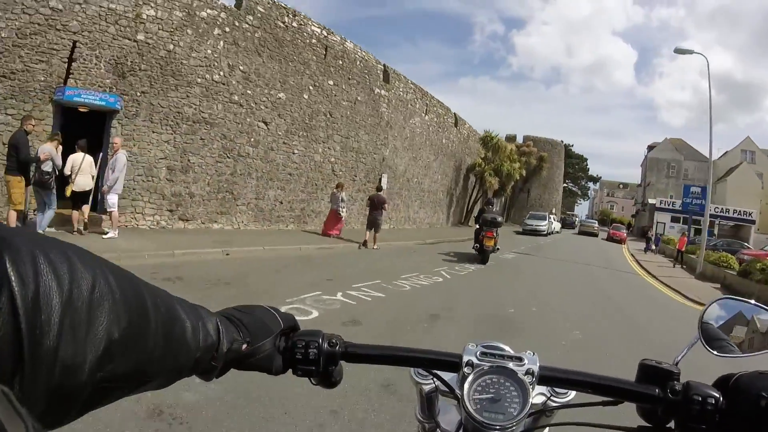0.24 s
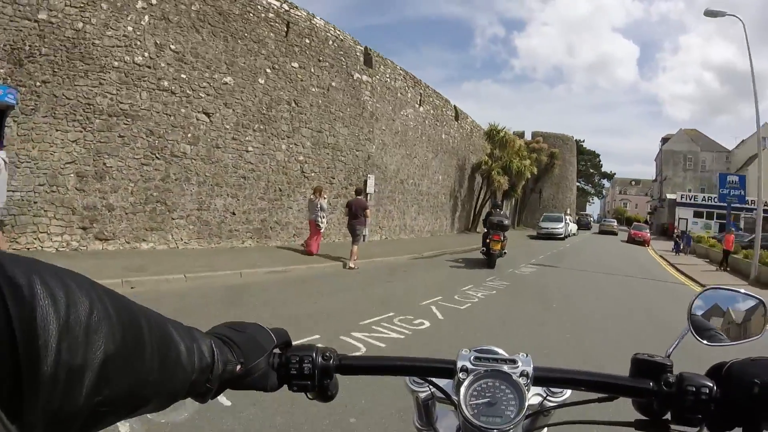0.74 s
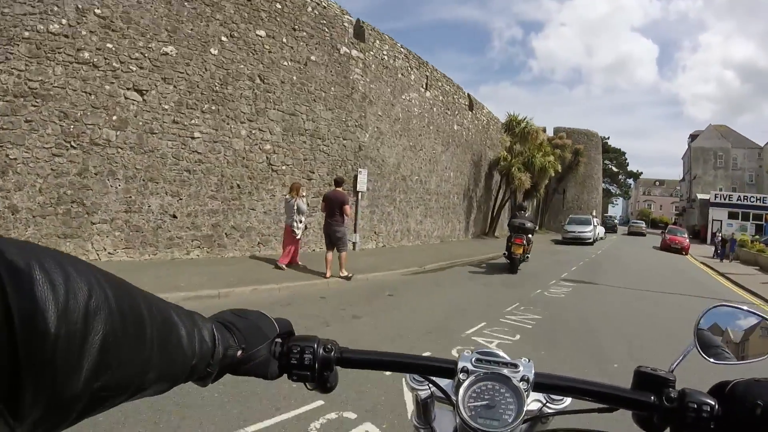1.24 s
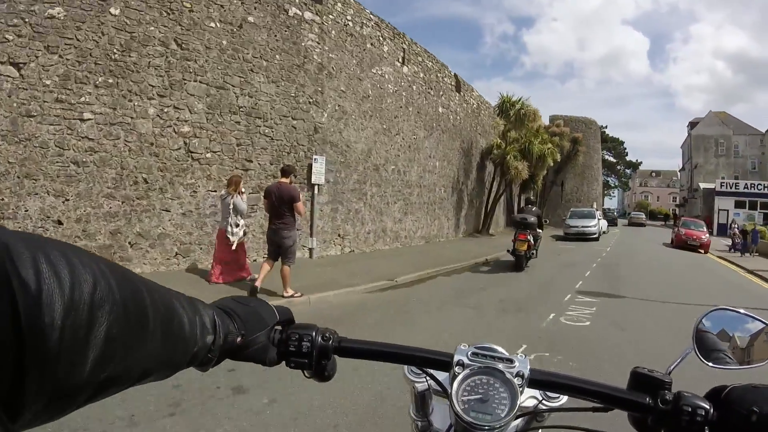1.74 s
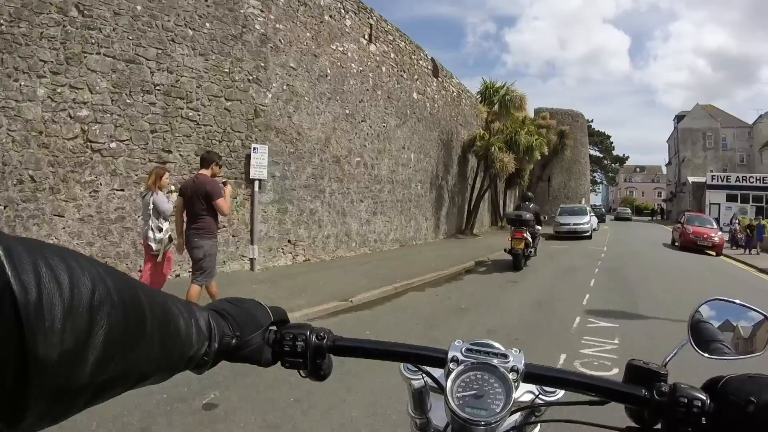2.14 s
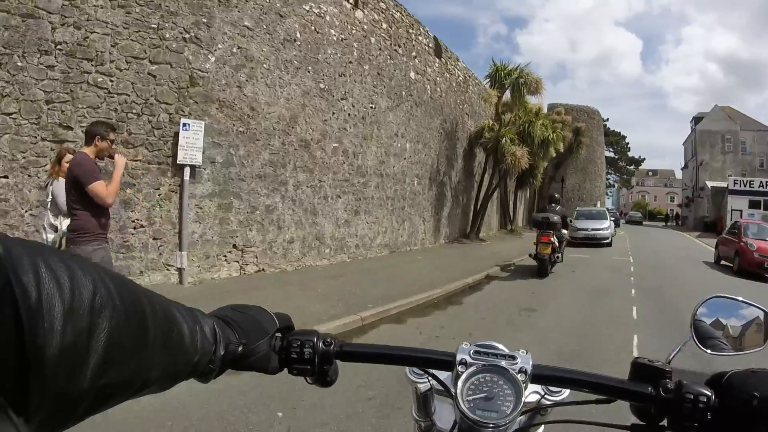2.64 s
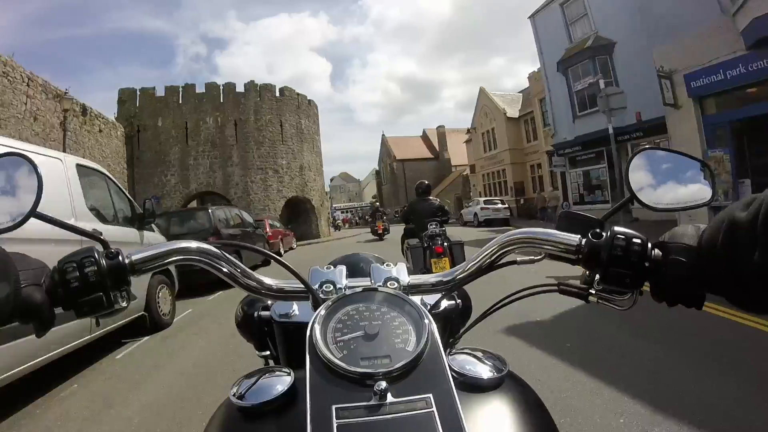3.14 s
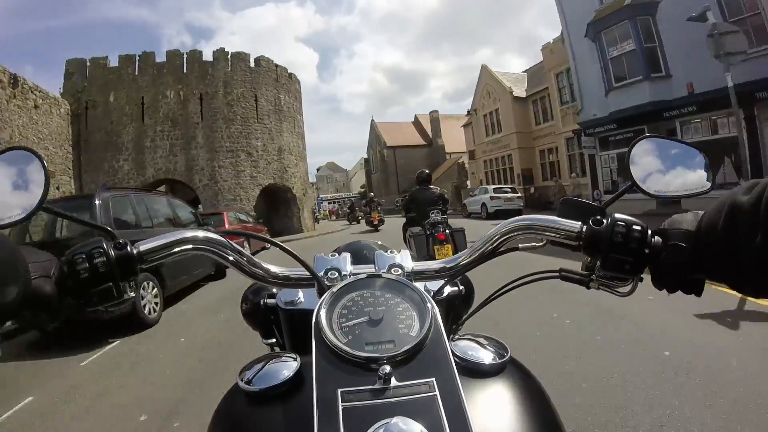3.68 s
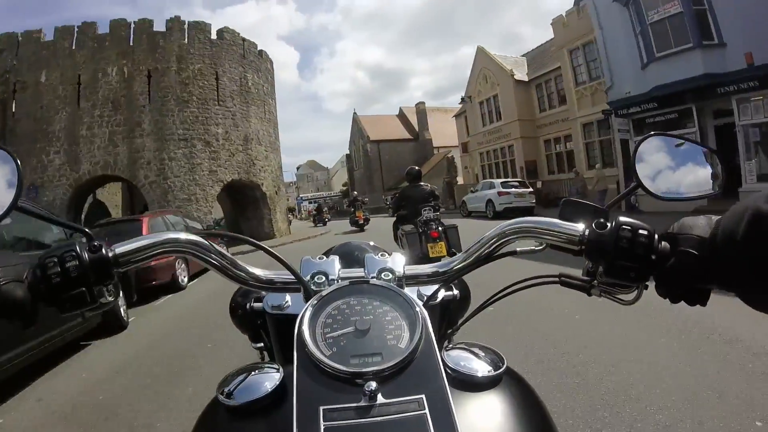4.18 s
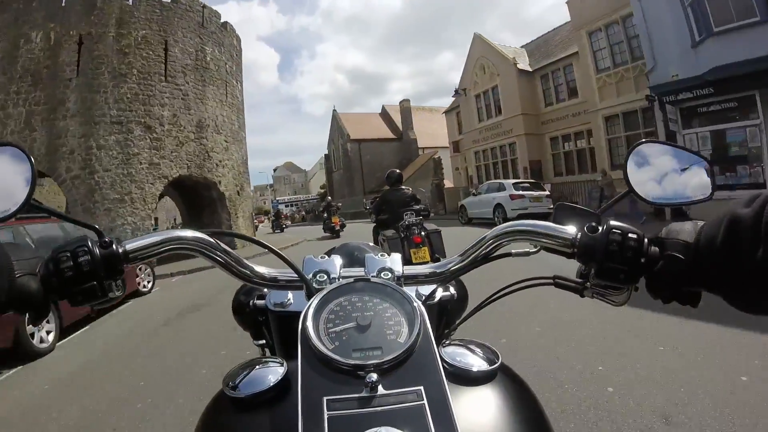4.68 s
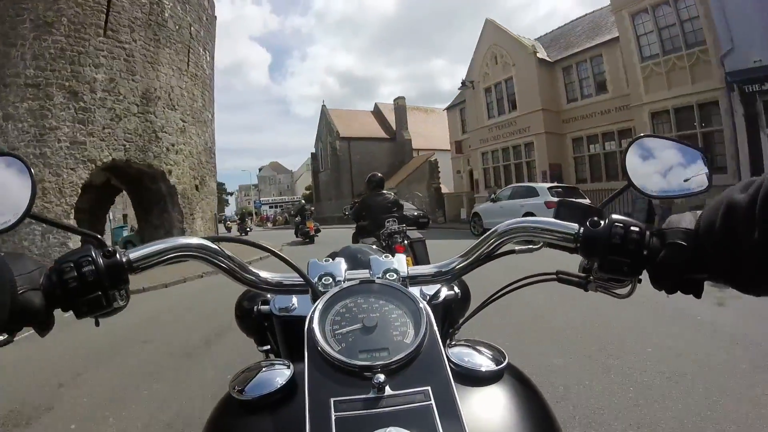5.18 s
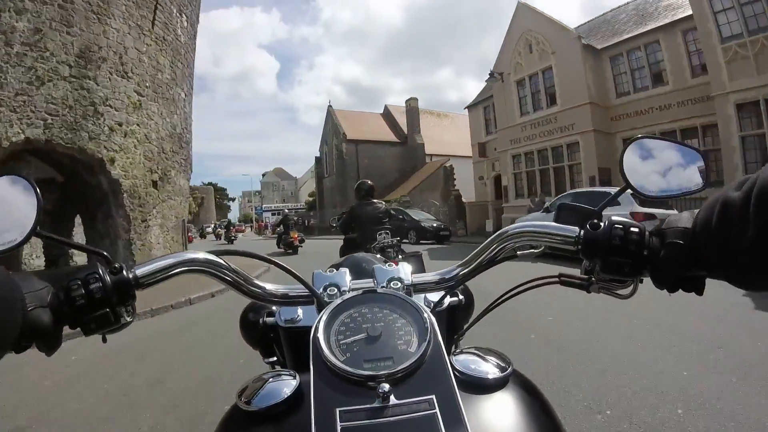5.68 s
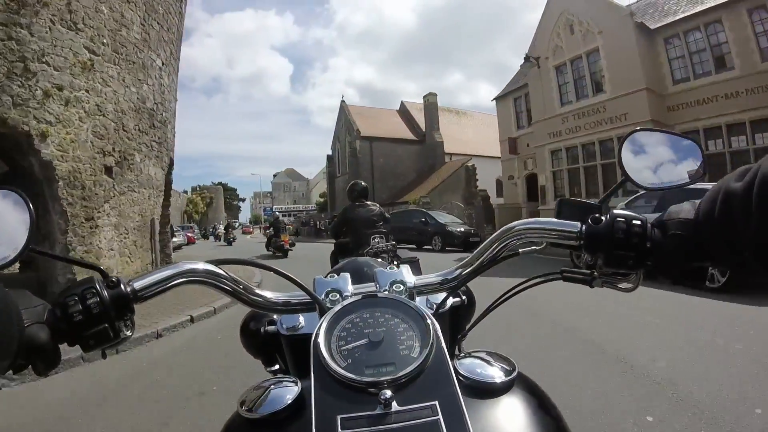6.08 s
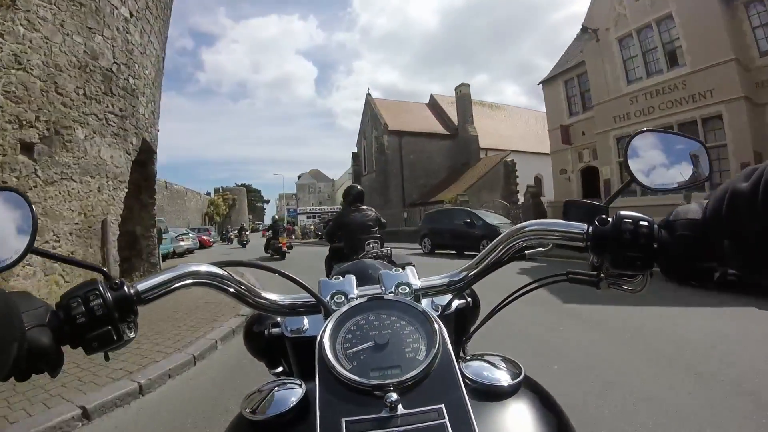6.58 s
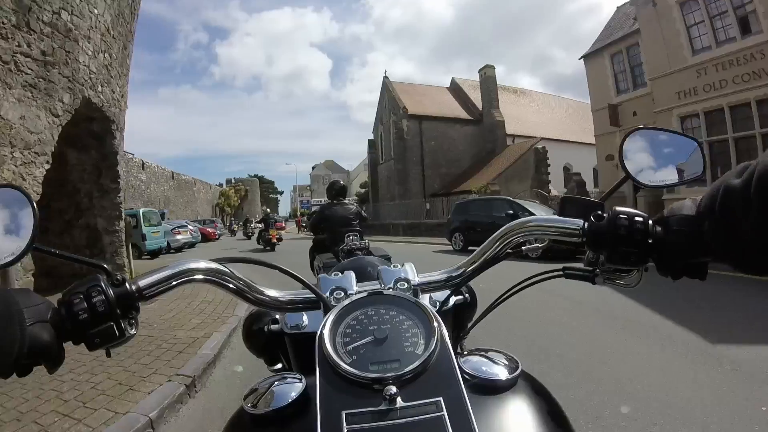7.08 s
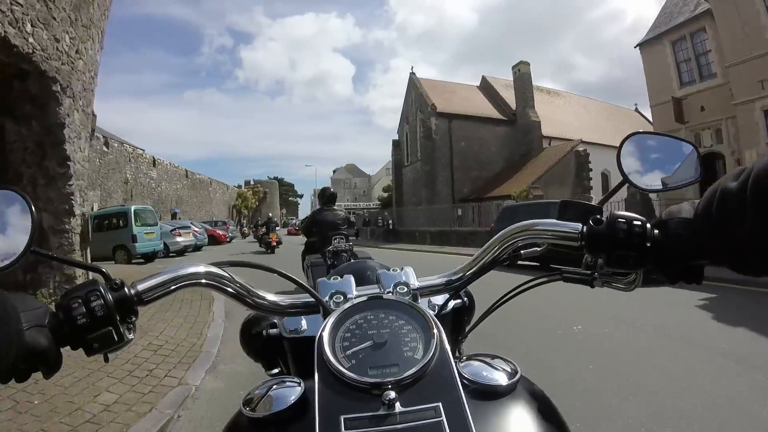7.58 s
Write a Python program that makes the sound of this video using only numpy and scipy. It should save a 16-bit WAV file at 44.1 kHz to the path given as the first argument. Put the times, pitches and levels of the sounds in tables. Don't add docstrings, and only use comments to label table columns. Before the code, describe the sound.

Heard from a camera on a large two-cylinder motorcycle: revs fall to a loud, lumpy idle thrown back by a stone wall, with deep thumps, rasp and hollow exhaust barks. A click marks an abrupt cut to a much quieter, even engine roll in a street. The throttle shuts, metallic valve ticks show through as the engine coasts and fades, and the idling motorcycle ahead comes near.

```python
import sys
import numpy as np
from scipy import signal
from scipy.io import wavfile
from scipy.ndimage import uniform_filter1d

SR = 44100
rng = np.random.default_rng(int(sys.argv[2]) if len(sys.argv) > 2 else 0)


def volts_from_db(level):
    exponent = np.asarray(level, float) / 20
    return 10 ** exponent


def transcribe(u):
    v = np.clip(np.atleast_2d(u).T, -1, 1)
    q = np.round(v * 32767).astype(np.int16)
    wavfile.write(sys.argv[1], SR, q)


N = 344862
CUT_S = 3.07834


def evened(x):
    return x / np.sqrt(np.mean(x ** 2) + 1e-20)


def drifting(x, size, passes=1):
    for _ in range(passes):
        x = uniform_filter1d(x, size=size)
    return evened(x)


def curve(rows):
    s, value = np.transpose(rows)
    return np.interp(np.arange(N) / SR, s, value)


def firings(speed, start, pattern, jitter_s, spread_db):
    turns = start + np.cumsum(curve(speed)) / SR
    chance = rng.standard_normal((120, len(pattern), 2))
    out = np.zeros(N)
    for k, (place, db) in enumerate(pattern):
        at = np.interp(np.arange(120) + place, turns, np.arange(N), -N, -N)
        at = at + jitter_s * SR * chance[:, k, 0]
        inside = (at >= 0) & (at < N)
        out[at[inside].astype(int)] += volts_from_db(db + spread_db * chance[inside, k, 1])
    return out


def noise(spectrum, peaks, size, patchy_db):
    hz = np.fft.rfftfreq(size, 1 / SR)
    a, b, patches = rng.standard_normal((4 * N // size + 5, len(hz), 3)).T
    patches = uniform_filter1d(patches, size=9, axis=0)
    patches = evened(uniform_filter1d(patches, size=5, axis=1))
    f, db = np.transpose(spectrum)
    shape_db = np.interp(np.log(hz + 1), np.log(f + 1), db, -100, -100)
    for at_hz, width_hz, boost_db in peaks:
        shape_db += boost_db / (1 + (2 * (hz - at_hz) / width_hz) ** 2)
    z = (a + 1j * b) * volts_from_db(shape_db[:, None] + patchy_db * patches)
    return evened(signal.istft(z, nperseg=size, noverlap=size * 3 // 4)[1][:N])


def puffed(x, clicks, depth, fade_s):
    flare = signal.lfilter([1], [1, -np.exp(-1 / (fade_s * SR))], clicks)
    return evened(x * (1 + depth * uniform_filter1d(flare, size=60)))


def swelling_rings(rows, rise_s, trim_db):
    out, u = np.zeros(N), np.arange(3000) / SR / rise_s
    chance = rng.uniform(-1.18, 1, (len(rows), 2))
    for (s, db, hz), (phase, bend) in zip(rows, chance):
        turns = hz * rise_s * (u + .02 * bend * (u - 1) ** 2)
        ring = u * np.exp(1 - u) * np.sin(2 * np.pi * turns + np.pi * phase)
        out[round((s - .004) * SR):][:3000] += volts_from_db(db + trim_db) * ring
    return out


def pipe(s, db, modes, pitch=1):
    lead = round(.1 * SR)
    t, ring = np.arange(SR // 3) / SR, 0
    shift = np.broadcast_to(pitch, s.shape)[:, None]
    for hz, mode_db, t60, rise_s, low in modes:
        turns = hz * (t - low * rise_s * (1 - np.exp(-t / rise_s)))
        swell = (1 - np.exp(-t / (rise_s * (1 - low)))) ** 2
        ring = ring + volts_from_db(mode_db - 60 * t / t60) * swell * np.sin(2 * np.pi * turns * shift)
    out = np.zeros(N + lead)
    for at, gain, sound in zip(np.round(s * SR).astype(int) + lead, volts_from_db(db), ring):
        out[at:at + len(t)] += gain * sound
    return out[lead:] / np.std(out[lead:lead + round(CUT_S * SR)])


def tones(speed, orders, level, smear, wobble):
    step = 16
    turns, out = np.cumsum(curve(speed))[::step] / SR, 0
    for k, db in orders:
        drift_db, drift = (drifting(v, 400, passes=2) for v in rng.standard_normal((len(turns), 2)).T)
        twin = np.angle(1 + .7 * np.exp(-2j * np.pi * k * .4375))
        phase = 2 * np.pi * (k * turns + smear * k * k) + twin + wobble * drift
        out = out + volts_from_db(db + 3.3 * wobble * drift_db) * np.sqrt(2) * np.cos(phase)
    return volts_from_db(curve(level)) * signal.resample_poly(out, step, 1)[:N]


# (time [s], level [dB rms])
WHINE = [(0, -84), (.7, -84), (.78, -78), (1.98, -78), (2.05, -85), (3.08, -85)]


def whine():
    drift, flicker = (drifting(v, 1500) for v in rng.standard_normal((2, N)))
    turns = np.cumsum(11870 + 12 * drift) / SR
    return volts_from_db(curve(WHINE) + 3 * flicker) * np.sqrt(2) * np.sin(2 * np.pi * turns)


# (time [s], engine cycles [Hz])
IDLE_SPEED = [
    (0.0, 12.07),
    (0.5, 10.38),
    (1.0, 9.09),
    (1.3, 8.68),
    (3.1, 8.55),
]


def over_idle_hz():
    return curve(IDLE_SPEED) - IDLE_SPEED[-1][1]


# (frequency [Hz], density [dB per Hz])
WALL_RUMBLE = [(8.8, -54), (15, -34.5), (43, -15), (70, -10.5), (97, -33.5), (119, 1), (166, -7.5),
               (258, -4), (294, -7), (330, -12), (430, -66.5), (730, -120)]


def wall_rumble():
    front = firings(IDLE_SPEED, .9, [(.0, 0)], jitter_s=.0005, spread_db=1.3)
    return volts_from_db(-14.5) * puffed(noise(WALL_RUMBLE, [], size=4096, patchy_db=1.0), front, depth=1.0, fade_s=.04)


# (frequency [Hz], density [dB per Hz])
WALL_HISS = [(590, -18), (1000, -2.5), (1910, -8), (2270, -5.5), (2600, -13.5), (3330, -11), (4580, -14.5),
             (5950, -24.5), (7050, -24), (7810, -31), (8650, -26.5), (12200, -32), (15100, -63)]
# (frequency [Hz], width [Hz], boost [dB])
WALL_HOUSING = [(1278, 41, 7), (2265, 110, 7), (2734, 120, 7), (3370, 220, 4), (7030, 410, 5),
                (8420, 400, 7)]


def wall_hiss(gear):
    hiss = noise(WALL_HISS, WALL_HOUSING, size=1024, patchy_db=0.63)
    return volts_from_db(-43 + 0.13 * over_idle_hz()) * puffed(hiss, gear, depth=0.32, fade_s=0.026)


# (frequency [Hz], density [dB per Hz])
WALL_GROWL = [(180, -30), (300, -19), (327, -12.5), (355, -14.5), (561, -10.5), (638, -3), (867, -21.5),
              (1200, -38), (1560, -78), (2640, -120)]
# (time [s], level [dB])
OPENING = [
    (2.6, 1),
    (3.08, 1.5),
]


def wall_growl(gear):
    growl = puffed(noise(WALL_GROWL, [(635, 200, -4)], size=2048, patchy_db=1.5), gear, depth=.5, fade_s=.007)
    return volts_from_db(-32.5 - 0.24 * over_idle_hz() + curve(OPENING)) * growl


# (frequency [Hz], density [dB per Hz])
WALL_RASP = [(300, -33.5), (340, 2), (400, -2), (500, -5), (580, -30.5)]


def rasp():
    return volts_from_db(-36.5 + 1.66 * over_idle_hz()) * noise(WALL_RASP, [], size=2048, patchy_db=1.5)


# (peak time [s], peak level [dB], frequency [Hz])
KNOCKS = [(0.054, -29, 480), (0.134, -28.5, 503), (0.17, -28, 382), (0.202, -28, 398), (0.249, -26, 564),
          (0.347, -23, 557), (0.369, -21, 387), (0.416, -28, 390), (0.451, -29, 382), (0.499, -26, 380),
          (0.616, -29, 447), (0.646, -25, 431), (0.758, -26, 540), (0.815, -21, 500), (0.856, -26, 393),
          (0.895, -26, 474), (0.976, -23, 396), (1.026, -21, 495), (1.088, -27, 433), (1.196, -24, 395),
          (1.234, -30, 423), (1.296, -30, 390), (1.344, -25, 447), (1.384, -24.5, 544), (1.466, -25, 433),
          (1.499, -31, 471), (1.554, -28, 382), (1.614, -22, 485), (1.635, -27, 390), (1.733, -23, 456),
          (1.758, -30, 460), (1.807, -21, 456), (1.865, -24, 382), (1.889, -25, 417), (1.96, -35, 560),
          (2.226, -37, 473), (2.333, -28, 382), (2.391, -29, 447), (2.686, -24, 460), (2.722, -26, 556),
          (2.76, -25, 533), (2.788, -24, 557), (2.905, -20, 538), (2.978, -22, 540), (3.036, -20, 500)]


def knocks():
    return swelling_rings(KNOCKS, rise_s=.006, trim_db=-3.5)


# (peak time [s], peak level [dB], frequency [Hz])
BARKS = [(0.183, -30, 630), (0.264, -23.5, 600), (0.301, -25.5, 640), (0.344, -32, 657), (0.37, -25, 650),
         (0.459, -25, 640), (0.544, -25, 650), (0.605, -26, 670), (0.696, -30, 670), (0.729, -17.5, 650),
         (0.785, -27, 640), (0.804, -31, 650), (0.828, -27, 660), (0.851, -25, 660), (0.937, -23.5, 670),
         (0.955, -20, 664), (1.05, -28, 665), (1.085, -21.5, 664), (1.103, -20, 647), (1.125, -25, 640),
         (1.167, -24, 640), (1.188, -29.5, 632), (1.27, -24, 635), (1.314, -28, 614), (1.341, -27, 617),
         (1.389, -33.5, 610), (1.466, -31, 630), (1.505, -27, 642), (1.533, -28, 640), (1.584, -20, 627),
         (1.617, -24, 670), (1.646, -28, 670), (1.695, -45, 630), (1.774, -25, 596), (1.82, -20.5, 610),
         (1.848, -22.5, 670), (2.049, -26.5, 668), (2.082, -26.5, 645), (2.145, -28, 618),
         (2.162, -41, 615), (2.198, -25, 660), (2.315, -30, 636), (2.342, -29, 646), (2.432, -28, 625),
         (2.458, -28, 648), (2.51, -28, 630), (2.543, -23, 657), (2.626, -31, 620), (2.661, -25, 640),
         (2.687, -24, 617), (2.713, -25, 685), (2.744, -24, 645), (2.79, -23, 600), (2.861, -30, 626),
         (2.878, -31, 590), (2.901, -25, 644), (2.928, -25, 606), (2.985, -26, 570), (3.043, -20.5, 610),
         (3.063, -25, 633)]


def barks():
    return swelling_rings(BARKS, rise_s=.004, trim_db=-0.5)


# (front firing time [s], thump [dB], rear pipe [dB], pop [dB], shield ring [dB])
BURNS = [(-0.076, -4, -1, -7.0, -9.5), (0.0003, 0, -2.5, -0.5, 2), (0.0846, -3.0, -1.0, -1.5, -3.5),
         (0.1708, -1.0, -3, -0.5, -5.5), (0.2646, 3, -8, -3, -1), (0.357, -0.0, -6, 2.0, 1),
         (0.4515, 3, 0, -7.0, -9.5), (0.5514, 0, -3.5, -0.0, -1.0), (0.646, 3, -2, -1, 3),
         (0.747, -3.0, -1, 1.5, 4), (0.8484, -6.5, 2.0, -3.5, -1), (0.9595, 2.0, -2, 2.5, 4),
         (1.0682, 2.5, 0.5, 2.5, 1), (1.179, 2, -1.0, -1.5, -6.5), (1.2957, -2.5, 1, -0.5, 3),
         (1.4117, -2.5, 1.0, 1.5, -1), (1.525, 0.5, 3, 1.5, 0.0), (1.6386, -1.0, 1.5, 0.5, -7.0),
         (1.758, -0.5, 5, 2.5, 5), (1.8732, -0.5, 0.0, 1.5, -1.5), (1.9862, 2.0, 3, -1.5, 4.5),
         (2.1034, -0.5, -0.5, 0.5, 1), (2.2198, -1.0, 2.5, 0.5, 1.5), (2.3366, 0.5, 0.5, -2.5, 3.0),
         (2.452, 1.0, 1, -1, -5), (2.5641, 0.5, 1.5, -2.0, 1.5), (2.6826, 1, 0, 0.5, 3.0),
         (2.8025, 0.0, -2.5, 1.5, 6), (2.9265, 0.5, 3, 2.5, 6.5), (3.0437, -3.5, 0.0, 2.0, -13.0)]
# (thump delay [s], thump return [dB], rear delay [s], rear pitch [ratio], rear return [dB])
STRAY = [(.03, -12.5, 0, 0.94, -3), (.027, -12, -0.00032, 1.05, -6), (.03, -12.5, .002, 1.07, -5.5),
         (.033, -11, 0, 1, -4), (.033, -11.5, 0, 1.04, -3.5), (.011, -4, 0, 1.01, -1.5),
         (.036, -11.5, .005, 1.044, -5.5), (.02, -9.5, 0.0049, 1.1, -4.5), (.032, -12, .004, 1.03, -6),
         (.013, -5, .006, 1.07, -5), (.017, -7, .008, 1.04, -5), (.008, -6, -.005, 1, -1.5),
         (.011, -5.5, .004, 1.05, -7), (0.015, -3.5, 0.0065, 1.07, -7), (.009, -3.5, 0.0073, 1.022, -5.5),
         (.012, -4, 0.0014, 0.91, -5.5), (.013, -4, .003, 1.02, -5.5), (.009, -5, .001, .99, 0.5),
         (.011, -6, .003, 1, -4), (.014, -7, .001, 1, 0), (.015, -5, .008, 1, -4),
         (.008, -5, .005, 1, -2.5), (.008, -4, 0.018, 1, -4.5), (.008, -4.5, .005, 1.01, -2.5),
         (0.0135, -4.5, -0.0095, 1.04, -6), (.011, -6, .006, 0.93, -5), (.012, -1, -.002, 1.01, -2),
         (.009, -4, -.003, 1.05, -4), (.007, -7.5, -.002, 1.01, -5), (0.0024, -5, 0, 1, -5)]
# (frequency [Hz], level [dB], t60 [s], rise [s], low start of pitch [share])
FRONT_PIPE = [(37.8, -24, 0.35, 0.0068, .0), (61.2, -6.5, 0.15, 0.012, 0.00058),
              (78.4, 3.5, 0.14, 0.01, .0)]
REAR_PIPE = [(110.57, 17, .11, 0.041, 0.12), (129.7, -4.5, 0.21, 0.022, 0.09)]
REAR_EDGE = [(142, 0, .07, .03, 0.13)]
POP_PIPE = [(295, 0, 0.096, 0.0153, 0.742)]
SHIELD_RING = [(291.5, 0, 0.13, .012, .02)]


def idle_exhaust():
    s, thump_db, rear_db, pop_db, ring_db = np.transpose(BURNS)
    late_s, back_db, rear_late_s, rear_pitch, rear_back_db = np.transpose(STRAY)
    over_hz = over_idle_hz()

    pitch = 1 + .02 * np.interp(s * SR, np.arange(N), over_hz)
    thump_s = s + late_s
    thump = pipe(np.r_[thump_s, thump_s + 0.04304], np.r_[thump_db, thump_db + back_db - 1.5],
                 FRONT_PIPE, np.r_[pitch, pitch])

    rear_s = s + .42 * np.gradient(s) + rear_late_s
    rear = pipe(np.r_[rear_s, rear_s + 0.03522], np.r_[rear_db, rear_db + rear_back_db - 2.5],
                REAR_PIPE, np.r_[rear_pitch, rear_pitch])
    rear += volts_from_db(-18.5 + 0.5 * over_hz) * pipe(rear_s, rear_db, REAR_EDGE)

    pop = pipe(np.r_[s + .001, s + .036], np.r_[pop_db, pop_db - 11], POP_PIPE)
    shield_s = s + .023
    shield = pipe(np.r_[shield_s, shield_s + .0344], np.r_[ring_db, ring_db - 5], SHIELD_RING)
    return volts_from_db(-5.0) * thump + volts_from_db(-3.5) * rear + volts_from_db(-15.0) * pop + volts_from_db(-15.5 + 1.0 * over_hz) * shield


# (place [0-1], level [dB])
IDLE_FIRING = [(.40, 0), (.70, 0), (.97, -1)]


def wall_shot():
    gear = firings(IDLE_SPEED, .827, IDLE_FIRING, jitter_s=.002, spread_db=2)
    boom = volts_from_db(-9.5 - 0.52 * over_idle_hz()) * (wall_rumble() + idle_exhaust())
    return whine() + wall_hiss(gear) + wall_growl(gear) + rasp() + knocks() + barks() + boom


# (frequency [Hz], density [dB per Hz])
ROAD_RUMBLE = [(8.8, -49), (15, -9), (32, -25), (41, -2), (65, -5.5), (86, 1.5), (118, -4.5), (184, -10.5),
               (231, -18), (260, -23), (340, -31.5), (570, -120)]
# (time [s], level [dB])
RETREAT = [
    (5.0, 16),
    (5.5, 8.5),
    (6.1, 5),
    (6.4, -1.5),
    (7.82, -1.5),
]
# (time [s], level [dB])
PULLING = [
    (3.08, -2),
    (3.5, 1),
    (5.02, 0.5),
    (5.12, -12),
]


def road_rumble():
    lull = np.exp(-((np.arange(N) / SR - 5.87) / .04) ** 2)
    db = -36 + 0.5 * curve(RETREAT) - 9 * volts_from_db(curve(PULLING)) - 10 * lull
    return volts_from_db(db) * noise(ROAD_RUMBLE, [(88, 40, -4)], size=4096, patchy_db=.3)


# (frequency [Hz], density [dB per Hz])
ROAD_HISS = [(530, -4), (900, -6.5), (1170, -7), (1490, -1.5), (1720, -8), (2150, -4.5), (2790, -9),
             (3220, -8), (4860, -25), (6010, -22), (8670, -23), (11600, -37.5), (15100, -52)]
# (frequency [Hz], width [Hz], boost [dB])
ROAD_HOUSING = [(1477, 240, 5.44), (2110, 350, 5.7), (3210, 290, 6.7), (4136, 240, 7.6), (6200, 700, 3.6),
                (8700, 110, 5.6), (11520, 110, 4.7)]


def road_hiss(fire):
    hiss = noise(ROAD_HISS, ROAD_HOUSING, size=1024, patchy_db=0.78)
    return volts_from_db(-47 + 0.27 * curve(RETREAT)) * puffed(hiss, fire, depth=0.42, fade_s=0.004)


# (frequency [Hz], density [dB per Hz])
ROAD_GROWL = [(130, -48), (220, -14), (232, 3), (414, -4), (461, -11.5), (500, -4), (528, -18), (633, -6.5),
              (744, -28), (1100, -48), (1430, -56), (2420, -120)]


def road_growl(fire):
    growl = noise(ROAD_GROWL, [(670, 100, 4.0)], size=2048, patchy_db=1.5)
    return volts_from_db(-47.5 + 0.17 * curve(RETREAT)) * puffed(growl, fire, depth=0.27, fade_s=0.0054)


# (time [s], peak level [dB], frequency [Hz], t60 [s])
RATTLE = [(.779, -31, 1800, .03), (.779, -31, 3150, .03), (.779, -34, 4700, .025), (.779, -35, 2450, .012),
          (.779, -36, 3900, .012), (.779, -40, 5450, .012), (.779, -42, 6200, .012),
          (.779, -41, 7400, .014), (.779, -42, 9300, .01), (4.0865, -38, 1500, .025)]


def ticks(rows):
    out, t = np.zeros(N + 2000), np.arange(2000) / SR
    for s, db, hz, t60 in rows:
        ring = volts_from_db(db - 60 * t / t60) * np.sin(2 * np.pi * hz * t)
        out[round(s * SR):][:2000] += ring * np.tanh(t * 12 / t60)
    return out[:N]


def jolt():
    u = 4.0882 - np.arange(N) / SR
    return volts_from_db(-16.5) * np.sin(2 * np.pi * 265 * u) * np.exp(-(u / .0018) ** 2 / 2)


# (time [s], engine cycles [Hz])
RIDE_SPEED = [
    (3.6, 11.85),
    (4.0, 12.02),
    (5.15, 12.05),
    (5.3, 13.3),
    (5.55, 13.6),
    (6.2, 12.3),
    (7.82, 11),
]
# (place in cycle [0-1], pulling [dB], coasting [dB], frequency [Hz])
VALVES = [(.0, -69, -52.5, 8360), (.43, -69, -52, 6540), (.7, -51, -66, 6200)]


def valve_rows():
    t, turns = np.arange(N) / SR, np.cumsum(curve(RIDE_SPEED)) / SR
    turns = turns - turns[round(5.5844 * SR)]
    slack_from_s, slack_to_s = 5.15, 6.26
    chance, rows = rng.standard_normal((60, len(VALVES), 2)), []
    for k, (place, pull_db, coast_db, hz) in enumerate(VALVES):
        s = np.interp(np.arange(-31, 29) + place, turns, t)
        db = np.where(s < slack_to_s, coast_db, pull_db - 8)
        db = np.where(s < slack_from_s, pull_db, db)
        strays = zip(s, db + 3.5 * chance[:, k, 0], hz * (1 + 0.048 * chance[:, k, 1]))
        rows += [row for row in strays if CUT_S < row[0]]
    return rows


# (time [s], peak level [dB], frequency [Hz])
CLACKS = [(4.6889, -52, 6210), (5.2088, -44, 7880), (5.3958, -51, 5960), (5.6587, -46, 8440),
          (5.7336, -46, 8980), (5.7675, -47, 6650), (5.8094, -49, 6170), (6.1586, -49, 6660),
          (6.204, -48, 7600), (7.4207, -49, 6320)]


def valve_ticks():
    modes = [(1.0, 1), (.9, -4), (1.1, -4), (1.2, -8)]  # (pitch [ratio], level [dB])
    return ticks([(s, db + side_db, hz * ratio, .015)
                  for s, db, hz in valve_rows() + CLACKS for ratio, side_db in modes])


# (time [s], engine cycles [Hz])
AHEAD_SPEED = [
    (3.08, 8.6),
    (6.1, 8.52),
    (6.65, 8.32),
]
# (order [per cycle], level [dB rms])
AHEAD_ORDERS = [(5, -52.9), (6, -48.5), (7, -47.5), (8, -45.2), (9, -41.5), (10, -42.0), (11, -46.3),
                (12, -47.2), (13, -53.9), (14, -47.4), (15, -49.8), (16, -53.7), (17, -48.6), (18, -52.1),
                (19, -51.4), (20, -50.6), (21, -52.7)]
# (time [s], level [dB])
NEARING = [(5.5, -26), (5.9, -9), (6.0, -9), (6.25, 1.5), (6.6, 0), (6.85, 3), (7.15, -3), (7.82, 1.5)]


def rider_ahead():
    return tones(AHEAD_SPEED, AHEAD_ORDERS, NEARING, smear=.05, wobble=.3)


# (order [per cycle], level [dB rms])
RIDE_ORDERS = [(3, -56.0), (4, -49.5), (5, -39.9), (6, -42.5), (7, -34), (8, -38.5), (9, -42.5),
               (10, -48.0), (11, -44.3), (12, -41.9), (13, -47.1), (14, -49.2), (15, -42.9), (16, -60.0),
               (17, -49.4), (18, -58.6), (20, -59), (21, -57), (22, -57), (24, -61), (26, -59), (28, -57),
               (30, -59), (31, -59), (34, -60)]
COAST_ORDERS = [(3, -54), (5, -39), (8, -50), (9, -49), (14, -46), (15, -47), (16, -51)]
# (time [s], level [dB])
COASTING = [
    (5.1, -30),
    (5.28, 0),
    (5.72, 1),
    (5.85, -25),
]


def own_engine():
    pulling = tones(RIDE_SPEED, RIDE_ORDERS, PULLING, smear=.21, wobble=.12)
    return pulling + tones(RIDE_SPEED, COAST_ORDERS, COASTING, smear=.09, wobble=.3)


# (place [0-1], level [dB])
RIDE_FIRING = [(.0, -2), (.43, -2)]


def road_shot():
    fire = firings(RIDE_SPEED, .3, RIDE_FIRING, jitter_s=.0005, spread_db=3.5)
    return road_rumble() + road_hiss(fire) + road_growl(fire) + rider_ahead() + own_engine()


def scene():
    n, cut, first = np.arange(N), round(CUT_S * SR), wall_shot()
    first += (-.41 - first[0]) * np.exp(-(n / 90) ** 2)
    first += (.27 - first[cut]) * np.exp(-((n - cut) / 60) ** 2)
    shots = np.where(n < cut, first, road_shot())
    return (shots + ticks(RATTLE) + jolt() + valve_ticks())[None]


def low_pass(x):
    return signal.sosfilt(signal.butter(12, 15240, fs=SR, output="sos"), x)


def record(dry):
    hissy = dry + volts_from_db(-85.0) * rng.standard_normal(dry.shape)
    pressed = 1.166 * np.tanh(hissy / 1.274)
    return low_pass(pressed)


dry = scene()
out = record(dry)
transcribe(out)
```